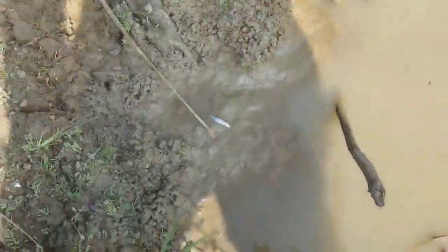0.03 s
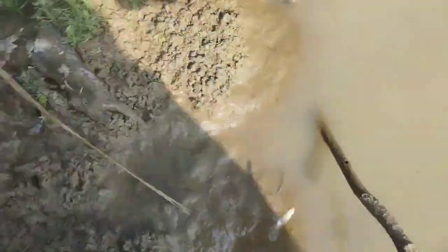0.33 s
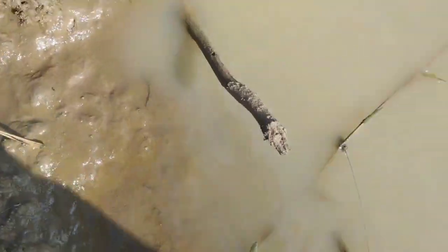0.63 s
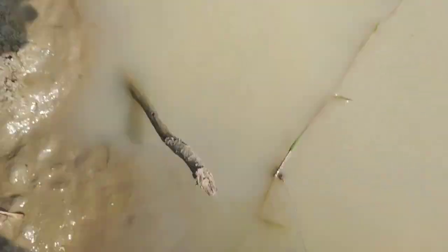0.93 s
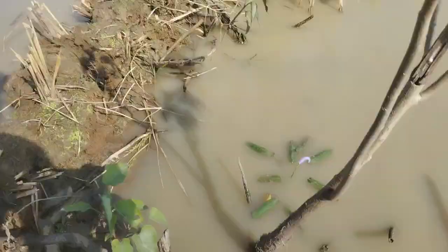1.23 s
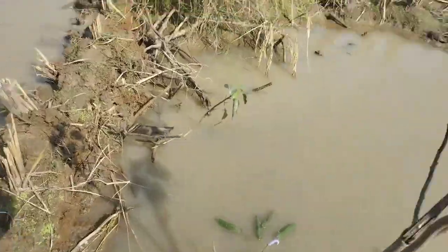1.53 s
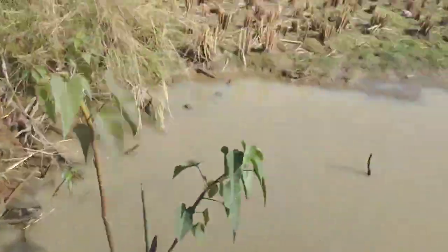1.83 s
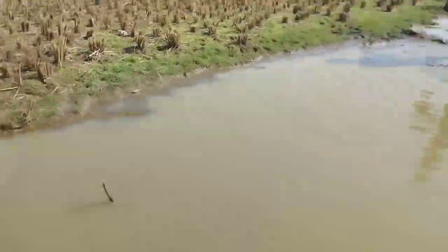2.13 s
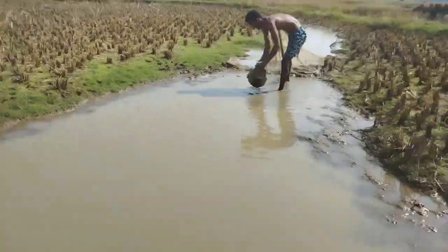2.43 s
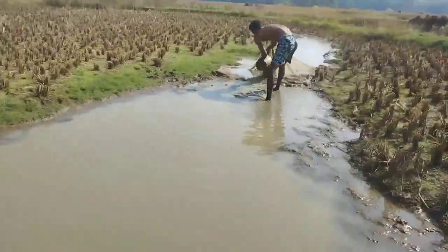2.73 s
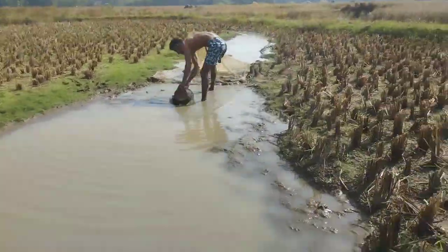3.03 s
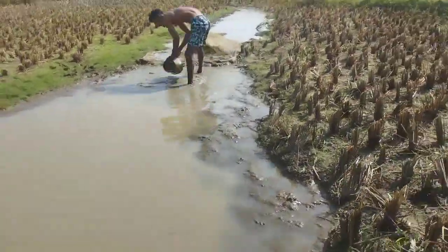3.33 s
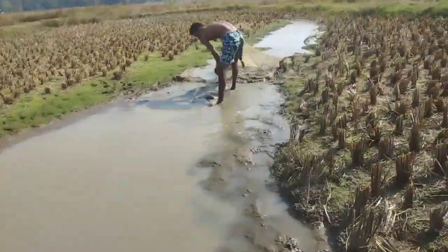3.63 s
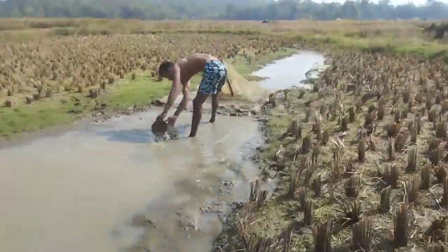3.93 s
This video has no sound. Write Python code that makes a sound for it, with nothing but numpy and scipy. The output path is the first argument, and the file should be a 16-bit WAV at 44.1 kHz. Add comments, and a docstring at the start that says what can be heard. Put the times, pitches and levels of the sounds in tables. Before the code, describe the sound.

Shallow water is scooped and sloshed in a flooded field. A few light splashes give way to a lull with faint straw crackle, then wind buffets the microphone and quicker, louder splashes follow with drips.

```python
"""At the edge of a flooded field, muddy water is scooped and slopped in surges.
Each slosh is a cloud of tiny ringing bubbles. Spray and wet straw crackle brightly above it,
with sharp snaps, wet slaps of falling water and drips that each trap a bubble.
Over a faint breeze, lone swirls of air thump the microphone and gusts buffet it, twice strongly."""
import sys
import numpy as np
from scipy import signal
from scipy.fft import rfft, irfft
from scipy.io import wavfile
from scipy.ndimage import uniform_filter1d

SR = 44100
rng = np.random.default_rng(int(sys.argv[2]) if len(sys.argv) > 2 else 0)


def unload_wav(signal):
    """Save mono or channel-first audio to the path in sys.argv[1] as 16-bit WAV at rate SR, clipped to [-1, 1]."""
    wavfile.write(
        sys.argv[1],
        SR,
        np.round(np.clip(np.atleast_2d(signal).T, -1, 1) * 32767).astype(np.int16),
    )


N = 176400
T = np.arange(N) / SR
HZ = np.fft.rfftfreq(N, 1 / SR)
SPAN = 32768  # samples set aside for one swell of sound

# Surges of water: start_s, rise_s, hold_s, decay_s, level_db, brightness_db_per_octave, spray_db
SURGES = [(0.028, 0.0068, 0.028, 0.13, -44, -1, -43), (0.231, .008, 0.13, 0.023, -40.5, -1, -35),
          (0.407, 0.0021, 0.003, 0.048, -46.5, -1.5, -42.5), (0.711, 0.0076, 0.11, 0.11, -61, 4, -58.5),
          (0.92, 0.02, 0.0048, 0.0064, -48.5, 1.5, -53), (1.903, 0.0059, 0.012, 0.077, -58.5, 3.5, -66),
          (2.329, 0.0035, 0.018, 0.18, -59, -1, -55.5), (2.607, 0.004, 0.0059, 0.015, -44, -1, -38),
          (2.623, 0.024, 0.054, 0.054, -41, -2.5, -37), (2.789, 0.0018, 0.013, 0.066, -46.5, 2, -33.5),
          (2.811, 0.01, 0.024, 0.036, -38, 0, -39), (2.885, 0.0026, 0.0043, 0.057, -31.5, 0, -29),
          (3.072, 0.01, 0.064, 0.029, -44.5, 1, -32), (3.172, 0.0049, 0.047, 0.09, -48, -1, -35),
          (3.315, 0.012, 0.055, 0.049, -36, -0.5, -30), (3.405, 0.01, 0.14, 0.049, -56, -3.5, -48),
          (3.558, 0.013, 0.019, 0.035, -37, 0, -29.5), (3.611, 0.0094, 0.06, 0.16, -44, 6.5, -36.5),
          (3.763, 0.069, 0.02, 0.049, -35.5, -3.5, -26), (3.927, .015, 0.1, 0.028, -35.5, -12, -36)]


def amp(db):
    """Turns decibels into a gain to multiply by."""
    return 10 ** (np.asarray(db) / 20)


def unit(x):
    """Scales a signal to an average (rms) level of 1."""
    return x / np.sqrt(np.mean(x ** 2) + 1e-20)


def add(mix, start_s, sound):
    """Mixes a sound in at the given time."""
    part = mix[max(round(start_s * SR), 0):][:len(sound)]
    part += sound[:len(part)]


def colour(x, points):
    """Shapes bass and treble along (pitch_hz, level_db) points; average level 1."""
    hz, db = np.transpose(points)
    curve_db = np.interp(np.log(HZ + 1), np.log(hz), db)
    return unit(irfft(rfft(x) * amp(curve_db), N))


def wobble(rate_hz):
    """Smooth random motion, mostly slower than rate_hz."""
    return unit(irfft(rfft(rng.standard_normal(N)) / (1 + (HZ / rate_hz) ** 4), N))


def impacts(per_s, spread_db):
    """Random clicks: a few are much louder than the rest, or softer if spread_db is negative."""
    sizes = amp(spread_db * np.minimum(rng.exponential(1, N), 4))
    return sizes * rng.choice([-1, 1], N) * (rng.random(N) < per_s / SR)


def bubble(hz, decay_s, climb=0):
    """A dying ring. As the bubble surfaces, its pitch gains the fraction climb every decay_s."""
    age = np.arange(0, 6 * decay_s, 1 / SR) / decay_s
    return np.exp(-age) * np.sin(2 * np.pi * hz * decay_s * (age + climb * age ** 2 / 2))


def swell(rise_s, hold_s, decay_s):
    """A level that rises steadily, holds, then dies away."""
    t = T[:SPAN]
    return np.clip(t / rise_s, 0, 1) * np.exp(-np.maximum(t - rise_s - hold_s, 0) / decay_s)


def power_of(rows):
    """The power of many swells added up; the last column gives each one's level."""
    power = np.zeros(N)
    for start_s, rise_s, hold_s, decay_s, *_, level_db in rows:
        add(power, start_s, (amp(level_db) * swell(rise_s, hold_s, decay_s)) ** 2)
    return power


def clumps(decay_s=0.0022, share=0.41):
    """A gain that jumps at each little slap of water and drops straight back."""
    hits = abs(impacts(per_s=170, spread_db=-1.5))
    jumps = signal.lfilter([1], [1, -np.exp(-1 / (decay_s * SR))], hits)
    return unit(1 - share + share * unit(jumps))


def air(level_db=-53, breeze_hz=397, sway_db=3.5):
    """Faint open-air hiss over the swaying rumble of a light breeze."""
    # Tone of the breeze and open air: pitch_hz, level_db
    air_tone = [(25, 2.5), (60, 0.5), (200, -2), (300, -7.5), (500, -16.5), (1000, -24.5), (3000, -28.5),
                (7000, -33), (12000, -26), (16000, -30)]
    steady = colour(rng.standard_normal(N), air_tone)
    rumble = irfft(rfft(steady) / (1 + (HZ / breeze_hz) ** 4), N)
    hiss = steady - rumble
    return amp(level_db) * (hiss + rumble * amp(sway_db * wobble(rate_hz=6.7)))


def crackle(hiss_db=-1):
    """Swishing wet straw and the spray of each slosh: clumps of tiny bright ticks over a fine hiss."""
    # Swishes of wet straw: start_s, rise_s, hold_s, decay_s, level_db
    swishes = [(0, 0.0037, 0.015, 0.054, -46.5), (0.105, 0.11, 0.017, .008, -30.5),
               (0.359, 0.011, 0.0055, 0.0031, -26.5), (0.425, 0.026, 0.056, 0.31, -56.5),
               (0.94, 0.014, 0.027, 0.018, -55.5), (1.454, 0.017, 0.015, 0.14, -56.5),
               (1.591, 0.1, 0.057, 0.017, -46), (1.78, 0.017, 0.62, 0.14, -60.5),
               (2.523, 0.0057, 0.004, 0.01, -36.5), (2.569, 0.0018, 0.0048, 0.028, -40),
               (2.724, 0.0033, .005, 0.062, -32), (3.022, 0.002, 0.0023, 0.0036, -33),
               (3.422, 0.054, 0.045, 0.011, -28.5)]
    # Tone of spray and straw: pitch_hz, level_db
    crackle_tone = [(500, -42), (2000, -20.5), (5000, -13.5), (7500, -13), (9500, -6.5), (11500, 0.5),
                    (12700, 1), (14000, -1.5), (15500, -6.5)]
    ticks = unit(impacts(per_s=2500, spread_db=2.5))
    hiss = amp(hiss_db) * rng.standard_normal(N)
    loudness = np.sqrt(power_of(SURGES + swishes))
    return loudness * colour((ticks + hiss) * clumps(), crackle_tone)


def drips():
    """Single drops each trap one bubble; large bubbles ring lower and longer."""
    # Drips and plops: start_s, level_db, pitch_hz
    drops = [(.004, -43.5, 1020), (.276, -33, 2170), (.845, -41.5, 4450), (.941, -36.5, 1916),
             (0.941, -40, 3540), (2.33, -44.5, 5210), (2.43, -42.5, 4330), (2.535, -33.5, 5020),
             (2.634, -29.5, 1940), (2.844, -28.5, 1800), (2.996, -29, 2880), (3.119, -36.5, 790),
             (3.192, -31, 1800), (3.357, -25, 2050)]
    out = np.zeros(N)
    for start_s, level_db, pitch_hz in drops:
        decay_s = 0.0035 * np.sqrt(2000 / pitch_hz)
        add(out, start_s, amp(level_db) * bubble(pitch_hz, decay_s, climb=0.02))
    return out


def sloshes(bubbles_per_s=3400, ring_cycles=4.4, low_hz=282, top_hz=10700, gurgle_db=-16):
    """Each surge of water swells, holds and drains: a cloud of bubbles over foam, with a gurgle."""
    # Tone of churning water: pitch_hz, level_db
    water_tone = [(300, -9), (600, 0), (1000, -8), (1700, -1.5), (3000, 0.5), (5000, -0.5), (9000, -2.5)]
    pitches_hz = np.geomspace(500, 9000, 18)
    cloud = np.zeros(N)
    for pitch_hz in pitches_hz:
        births = impacts(bubbles_per_s * pitch_hz / pitches_hz.sum(), spread_db=6)
        ring = bubble(pitch_hz, ring_cycles / pitch_hz, climb=0.044)
        cloud += np.sqrt(pitch_hz) * unit(signal.oaconvolve(births, ring)[:N])
    foam = rng.standard_normal(N) * clumps()
    water = colour(unit(cloud) + foam, water_tone)
    hz = np.fft.rfftfreq(SPAN, 1 / SR)
    band = hz ** 2 / (hz ** 2 + low_hz ** 2) / (1 + (hz / top_hz) ** 6)
    out = np.zeros(N)
    for start_s, rise_s, hold_s, decay_s, level_db, brightness, _ in SURGES:
        at = rng.integers(0, N - SPAN)  # each surge uses a random stretch of the water
        tilt = amp(brightness * np.log2(hz + 1))
        body = unit(irfft(rfft(water[at:at + SPAN]) * band * tilt))
        pocket = amp(gurgle_db) * gurgle(foam[at:at + SPAN], rise_s + hold_s + decay_s)
        add(out, start_s, amp(level_db) * swell(rise_s, hold_s, decay_s) * unit(body + pocket))
    return out


def gurgle(foam, fall_s, start_hz=2230, fall_octaves=0.5, width_hz=510):
    """The air pocket in a slosh rings, its pitch falling as the pocket opens."""
    pitch_hz = start_hz * 2 ** (-fall_octaves * np.minimum(T[:SPAN] / fall_s, 1))
    turn = np.exp(2j * np.pi * np.cumsum(pitch_hz) / SR)
    pole = np.exp(-2 * np.pi * width_hz / SR)
    # Shift the falling pitch to 0 Hz, smooth away the rest, then shift it back up.
    smoothed = signal.lfilter([1], [1, -2 * pole, pole * pole], foam * turn.conj())
    return unit((turn * smoothed).real)


def slaps(ring_cycles=1.1):
    """Lumps of water smack the surface: a short spatter of noise around one rough pitch."""
    # Falling lumps of water: start_s, level_db, pitch_hz
    lumps = [(.055, -33.5, 4470), (0.1514, -38, 1300), (0.2445, -28.5, 3600), (.311, -35, 2068),
             (.365, -39, 4250), (0.375, -32, 5000), (0.732, -51, 3420), (0.784, -49, 5000),
             (0.932, -48, 3670), (2.82, -30.5, 3180), (2.891, -30, 1950), (3.109, -30, 4600),
             (3.583, -32.5, 3860)]
    shape = swell(rise_s=0.0011, hold_s=0, decay_s=0.0032)
    out = np.zeros(N)
    for start_s, level_db, pitch_hz in lumps:
        ring = bubble(pitch_hz, ring_cycles / pitch_hz)
        spatter = signal.lfilter(ring, 1, shape * rng.standard_normal(SPAN))
        spatter *= np.linalg.norm(shape) / np.linalg.norm(spatter)  # same energy at any pitch
        add(out, start_s, amp(level_db) * spatter)
    return out


def snaps(ring_cycles=1.5, tail_db=-13, tail_s=0.0025):
    """Straw snaps and drops strike: sharp ticks, each with a brief scatter of noise behind it."""
    # Snaps of straw and hits of drops: start_s, peak_db, pitch_hz
    ticks = [(0.094, -21, 6700), (0.2256, -5, 13000), (0.416, -20, 10600), (0.656, -25.5, 12100),
             (1.838, -40, 9500), (1.93, -32, 12000), (2.0135, -32, 13400), (2.4585, -27, 12500),
             (2.728, -20, 8450), (2.823, -19, 11000), (2.954, -21, 11100), (3.076, -21, 13600),
             (3.4986, -9, 5770), (3.701, -16.5, 9700), (3.743, -16, 10800), (3.877, -19.5, 6960),
             (3.9721, -11, 11900), (3.973, -20.5, 4895)]
    out, t = np.zeros(N), T[:2048]
    for start_s, peak_db, pitch_hz in ticks:
        ring = bubble(pitch_hz, ring_cycles / pitch_hz)
        ring *= np.minimum(T[:len(ring)] * pitch_hz, 1)  # builds up over one cycle
        scatter = unit(signal.lfilter(ring, 1, rng.standard_normal(len(t))))
        add(out, start_s, amp(peak_db) * ring / abs(ring).max())
        add(out, start_s, amp(peak_db + tail_db) * scatter * np.exp(-t / tail_s))
    return out


def wind(full_gust_db=-18, flutter_db=1.18):
    """Swirling air hits the microphone; the harder the gust, the higher in pitch the rumble reaches."""
    # Gusts: start_s, rise_s, hold_s, decay_s, level_db
    gusts = [(.2, .1, 0.013, 0.11, -45.5), (0.67, 0.063, 0.02, 0.086, -41),
             (2.025, 0.091, 0.011, .02, -33.5), (2.106, 0.009, 0.016, 0.052, -25.5),
             (2.181, 0.0089, 0.011, 0.025, -26), (2.203, 0.034, 0.026, 0.035, -22.5),
             (2.336, 0.013, 0.0076, 0.0085, -22.5), (2.365, 0.014, 0.014, 0.039, -22),
             (2.448, 0.02, 0.02, 0.0029, -30), (2.635, 0.0073, 0.011, 0.098, -32),
             (2.784, 0.0058, 0.019, 0.035, -31.5), (2.884, 0.023, 0.0055, 0.04, -27.5),
             (3.611, 0.022, 0.0074, 0.14, -28.5), (3.732, 0.052, 0.016, 0.0097, -21.5),
             (3.818, 0.0068, 0.035, 0.024, -19.5), (3.84, 0.041, 0.033, 0.023, -18),
             (3.913, 0.048, 0.036, .05, -18.5)]
    # Bands of rumble: pitch_hz, offset_db (from full_gust_db), fade_db_per_db (as the gust weakens)
    bands = [(31, -25, 0.42), (64.5, -16, 0.56), (120, -12.5, 0.78), (233, -9.5, 0.84), (338, -4.5, 1.36),
             (526, -6.5, 2), (890, -16.5, 2.5), (1300, -22, 2.5), (1800, -33, 3)]
    strength_db = 10 * np.log10(power_of(gusts) + 1e-12) - full_gust_db  # 0 in a full gust
    strength_db += flutter_db * wobble(rate_hz=85)
    spectrum = rfft(rng.standard_normal(N))
    centres = np.log([10] + [row[0] for row in bands] + [2 * bands[-1][0]])
    out = np.zeros(N)
    for k, (_, offset_db, fade_db_per_db) in enumerate(bands):
        share = np.interp(np.log(HZ + 1), centres, np.arange(len(centres)) == k + 1)
        rumble = unit(irfft(spectrum * share, N))
        rumble /= np.sqrt(uniform_filter1d(rumble ** 2, size=2048))  # even, so the gusts set the accents
        out += rumble * amp(full_gust_db + offset_db + fade_db_per_db * strength_db)
    return out


def thumps(width_cycles=0.27, push_db=-4):
    """A lone swirl of air pushes and pulls on the microphone: a round thump over a slower push."""
    # Lone swirls of air: centre_s, level_db, pitch_hz
    swirls = [(.336, -35, 187), (.45, -26.5, 200), (.467, -32, 180), (.69, -31, 300), (.712, -28, 165),
              (0.74, -24, 216), (0.815, -30.5, 138), (1.071, -26.5, 210), (1.25, -34, 188),
              (1.303, -35, 190), (3.484, -31, 240)]
    out = np.zeros(N)
    for centre_s, level_db, pitch_hz in swirls:
        for hz, db in ((pitch_hz, level_db), (pitch_hz / 2, level_db + push_db)):
            cycles = (T - centre_s) * hz
            hump = np.exp(1 - np.hypot(1, cycles / width_cycles))
            out += amp(db) * hump * np.cos(2 * np.pi * (cycles + rng.random()))
    return out


def scene():
    """Water, straw and wind over quiet open air, in one channel."""
    return (sloshes() + crackle() + snaps() + drips() + slaps() + wind() + thumps() + air())[None]


def record(dry):
    """Cuts away the very highest treble."""
    treble_cut = signal.firwin(401, cutoff=15750, window=("kaiser", 8), fs=SR)
    return signal.oaconvolve(dry, treble_cut[None], "same")


dry = scene()
out = record(dry)
unload_wav(out)
```